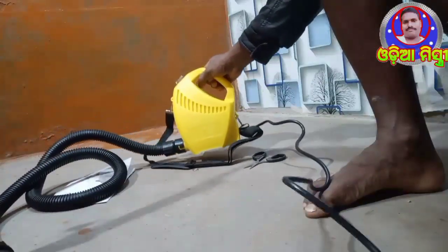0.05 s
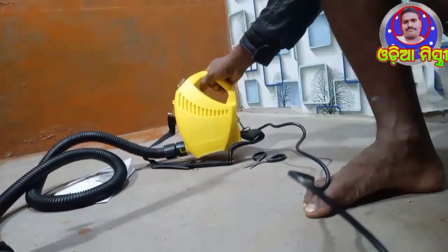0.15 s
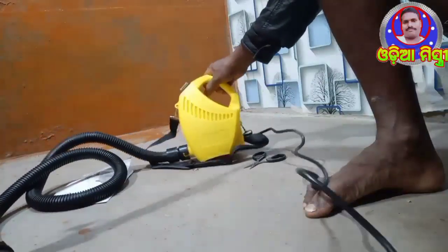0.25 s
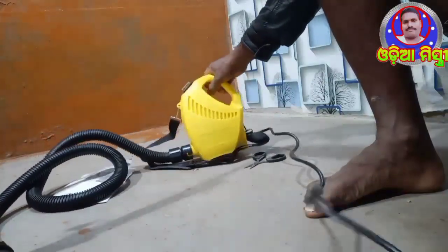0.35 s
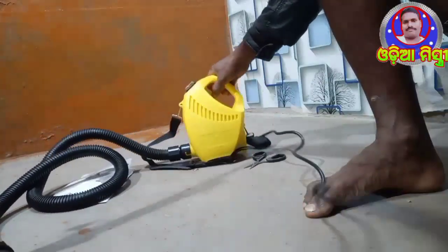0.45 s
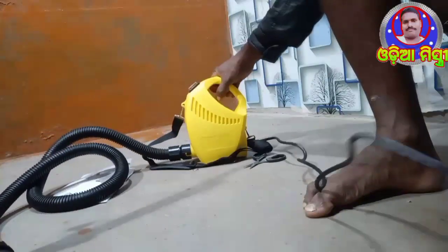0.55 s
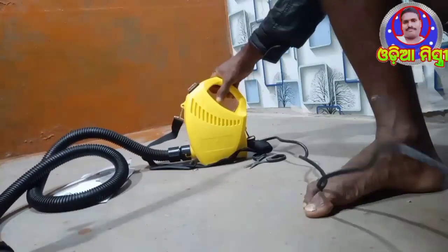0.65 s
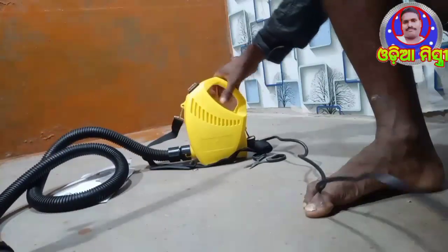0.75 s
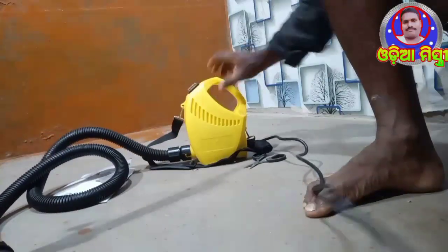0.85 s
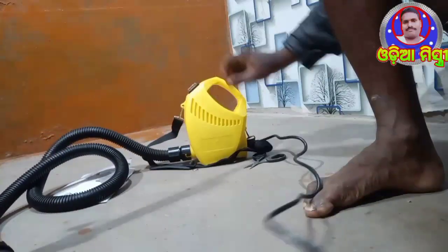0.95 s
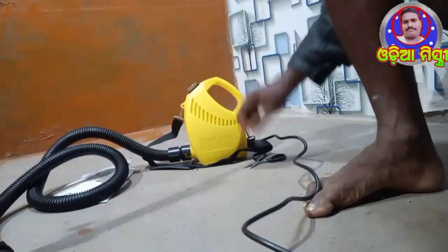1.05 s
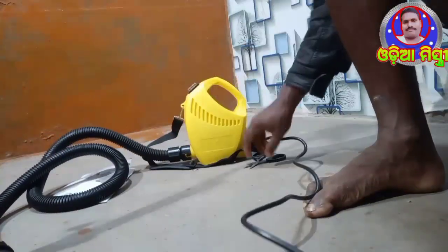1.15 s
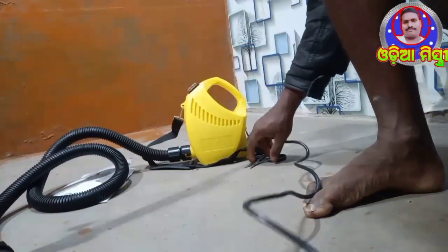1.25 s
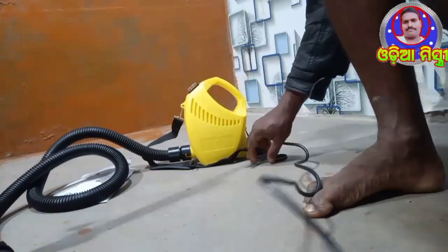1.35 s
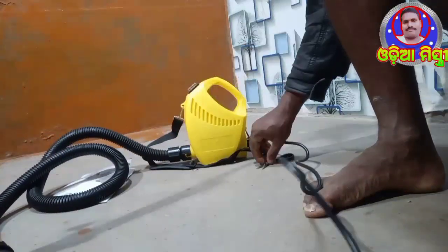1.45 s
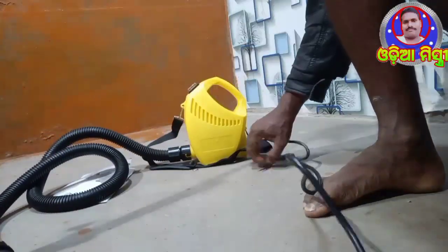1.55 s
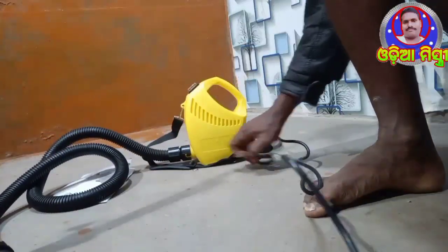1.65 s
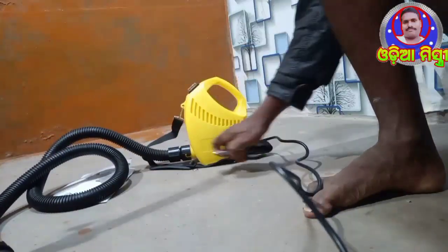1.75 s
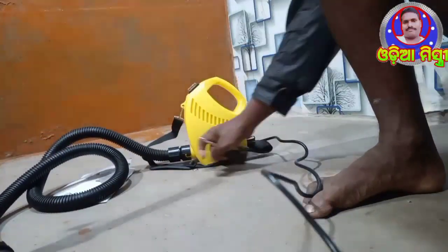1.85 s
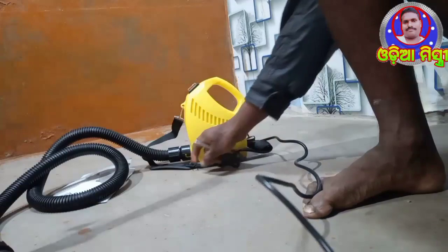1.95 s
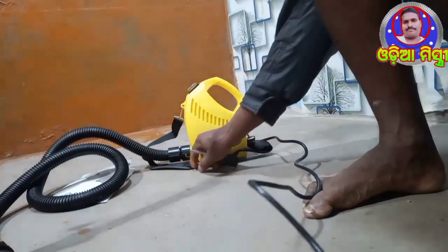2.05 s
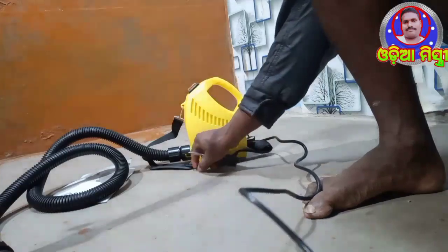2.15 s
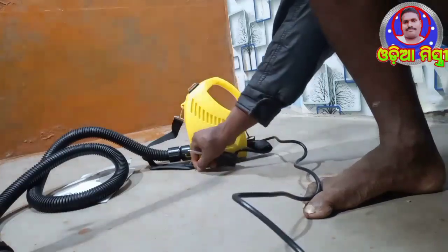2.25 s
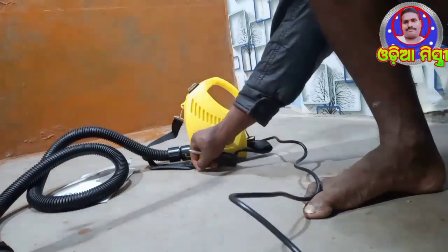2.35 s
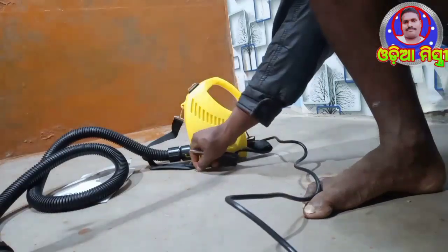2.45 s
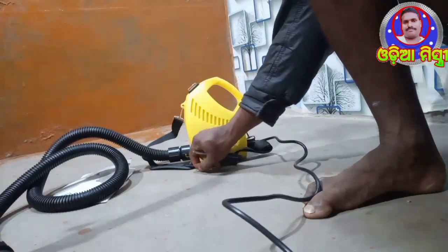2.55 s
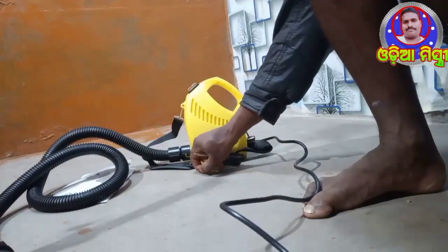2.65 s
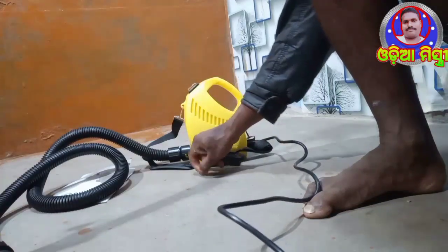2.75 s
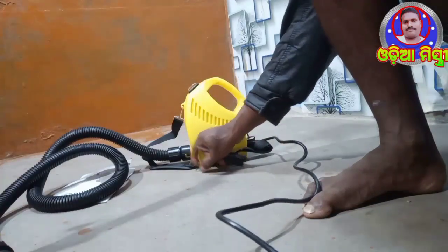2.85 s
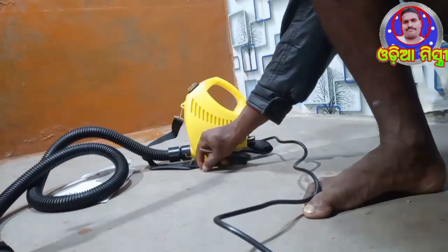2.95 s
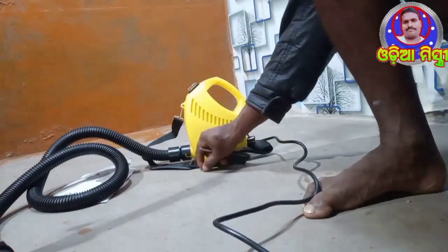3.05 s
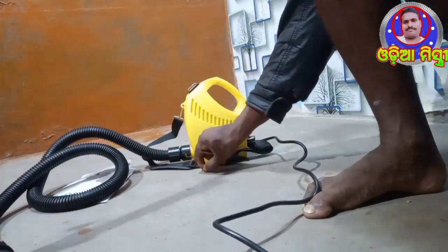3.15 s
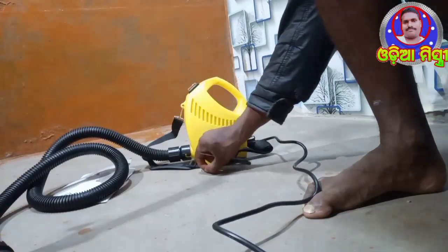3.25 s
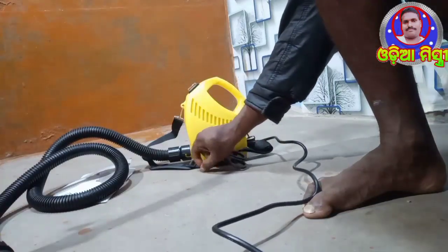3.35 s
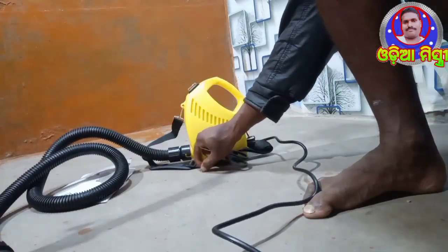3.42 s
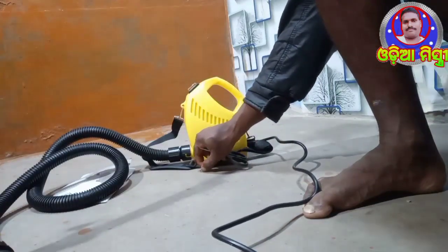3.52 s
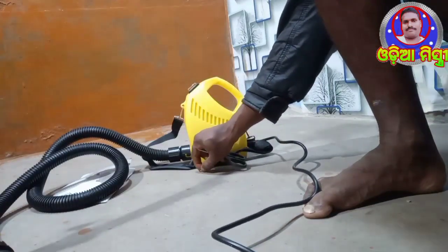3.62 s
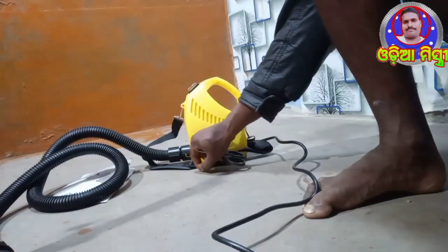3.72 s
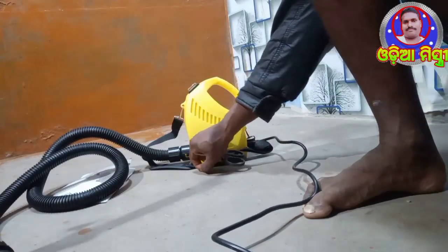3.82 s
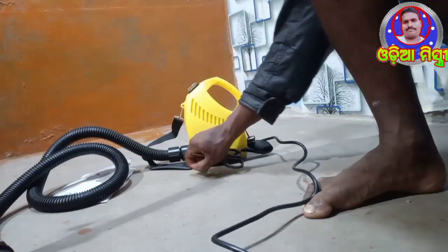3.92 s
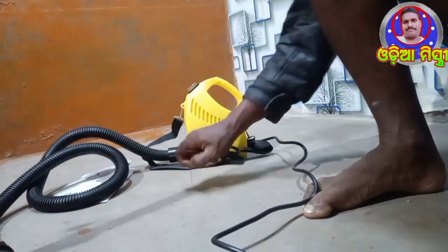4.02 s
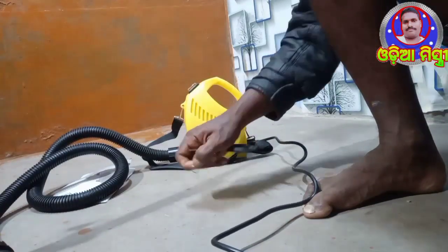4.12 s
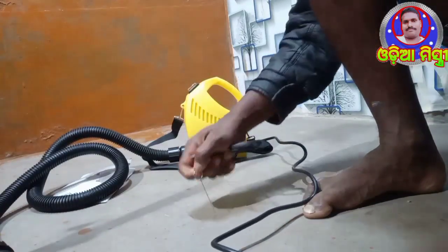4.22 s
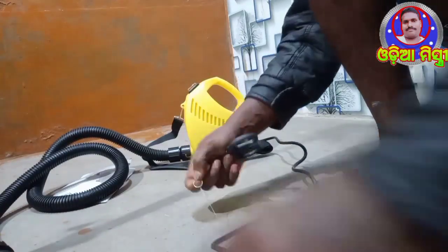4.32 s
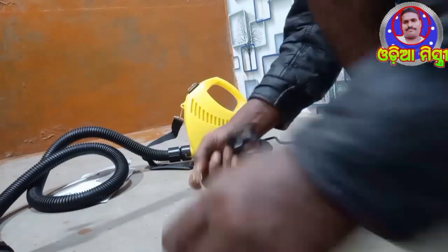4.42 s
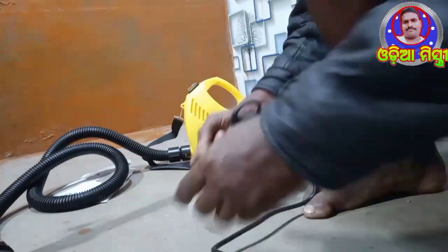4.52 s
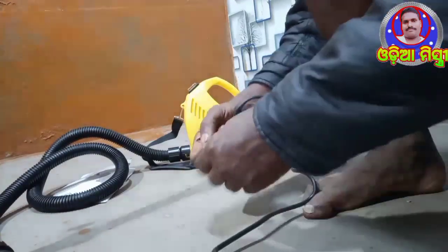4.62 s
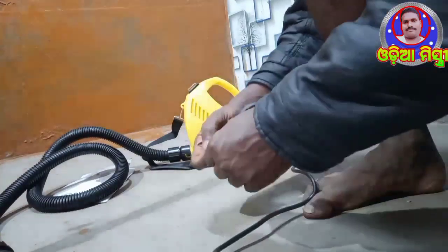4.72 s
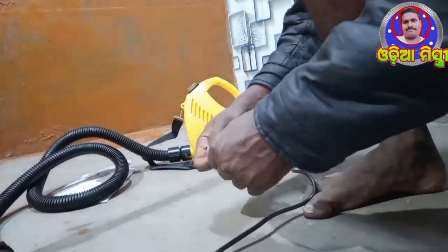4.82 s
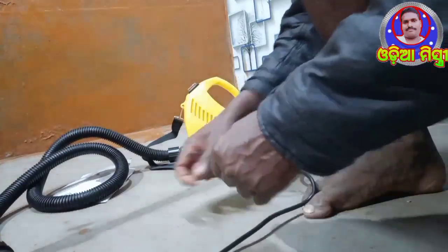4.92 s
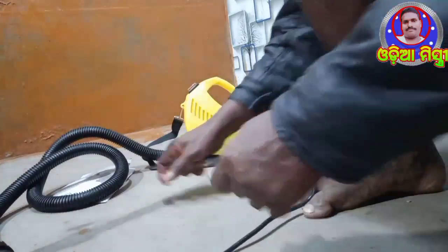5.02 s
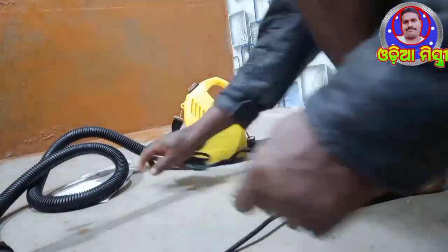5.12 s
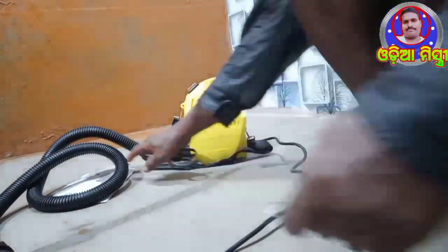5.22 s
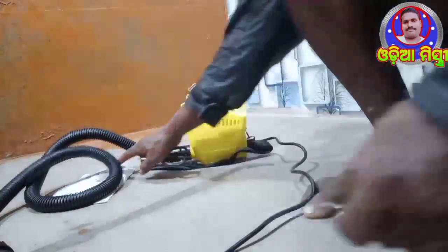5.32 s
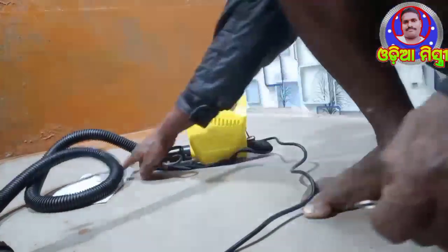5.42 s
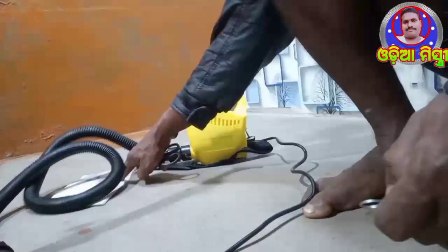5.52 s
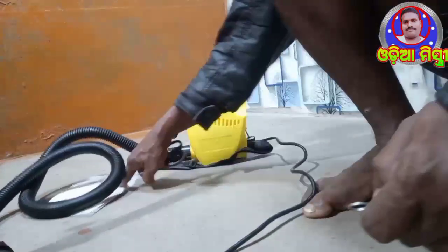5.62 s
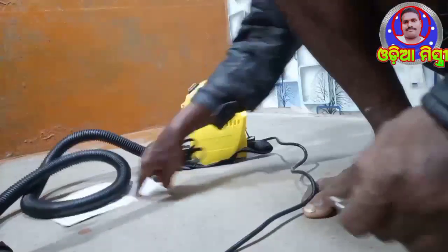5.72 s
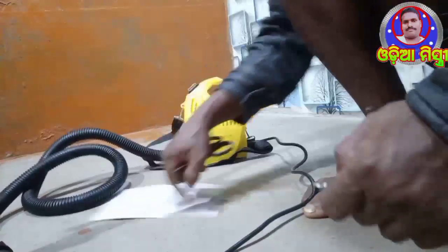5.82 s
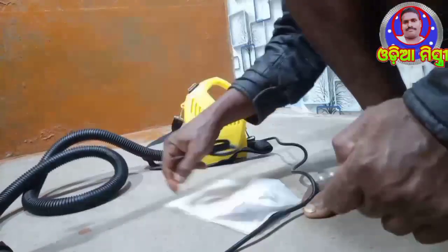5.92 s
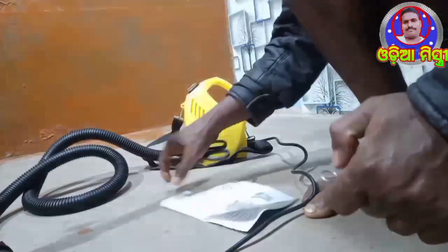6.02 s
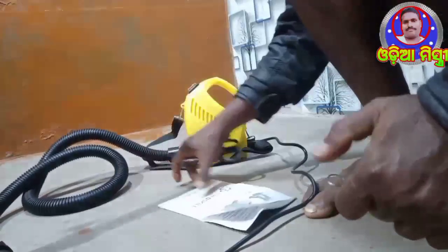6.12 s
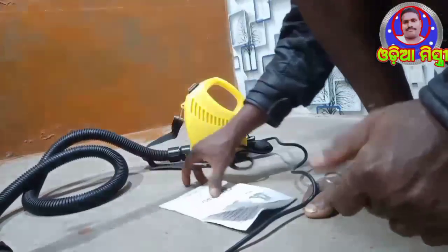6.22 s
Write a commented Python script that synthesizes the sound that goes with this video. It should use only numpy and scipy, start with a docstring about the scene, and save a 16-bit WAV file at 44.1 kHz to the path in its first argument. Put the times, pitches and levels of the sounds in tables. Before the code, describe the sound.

A hollow plastic unit clacks onto a hard floor, then a cable is handled with small snaps and a paper leaflet slides out.

```python
"""A plastic paint sprayer is set down on a hard floor in a small bare room: the impacts excite the modes
of its hollow housing as it rocks once onto its base, which then skids briefly. Hands pick up its cable
and work the tie loose; stick-slip friction makes a jacket sleeve swish, and stiff plastic releases its
strain in snaps. At the end the hose bumps dully as a paper leaflet is dragged out from under it, hissing
with its speed, and is pressed flat with a last snap."""
import sys
import numpy as np
from scipy import signal
from scipy.fft import rfft, irfft
from scipy.io import wavfile
from scipy.ndimage import uniform_filter1d

SR = 44100
rng = np.random.default_rng(int(sys.argv[2]) if len(sys.argv) > 2 else 0)


def wav_out(sig):
    """Save sig, one row per channel (or a flat mono array), as 16-bit PCM at SR to the path in sys.argv[1]."""
    wavfile.write(sys.argv[1], SR, np.round(np.clip(np.atleast_2d(sig).T, -1, 1) * 32767).astype(np.int16))


N = 276507


def amp(db):
    """Amplitude ratio of a level in decibels."""
    return 10 ** (np.asarray(db) / 20)


def unit_rms(x):
    """Normalisation to a mean power of 1."""
    return x / np.sqrt(np.mean(x ** 2) + 1e-20)


def curve_at(points, hz):
    """Interpolation of (f, value) points on a logarithmic frequency axis."""
    f, value = np.transpose(points)
    return np.interp(np.log(hz + 1), np.log(f + 1), value)


def add(mix, start_s, sound):
    """Superposition: a sound joins the mix at its start time."""
    part = mix[max(round(start_s * SR), 0):][:len(sound)]
    part += sound[:len(part)]


def coloured(x, spectrum, extra_db=lambda hz: 0, size=4096):
    """Minimum-phase filtering by a spectrum scaled to unit energy, then reshaped by extra_db."""
    hz = np.fft.rfftfreq(size, 1 / SR)
    gain = unit_rms(amp(curve_at(spectrum, hz))) * amp(extra_db(hz))
    cepstrum = irfft(np.log(gain))
    cepstrum[1:size // 2] *= 2  # folding onto positive time makes the filter causal
    cepstrum[size // 2 + 1:] = 0
    response = irfft(np.exp(rfft(cepstrum)))[:size // 2]
    return signal.oaconvolve(x, response)[:len(x)]


def resonate(x, hz, width_hz):
    """Forced vibration: a resonator of peak gain 1 whose natural frequency follows the curve hz."""
    carrier = np.exp(2j * np.pi * np.cumsum(hz) / SR)
    pole = np.exp(-np.pi * width_hz / SR)
    return 2 * (carrier * signal.lfilter([1 - pole], [1, -pole], x / carrier)).real


def ring(modes, rise_s, corner_hz):
    """Free vibration: damped modes of random phase; a soft blow barely excites those above corner_hz."""
    t = np.arange(SR) / SR
    hz, db, t60 = np.transpose(modes)[:, :, None]
    waves = amp(db - 60 * t / t60) * np.sin(2 * np.pi * (hz * t + rng.random(hz.shape)))
    onset = 1 - np.exp(-(t / rise_s) ** 2)
    return (waves / (1 + (hz / corner_hz) ** 2)).sum(0) * onset


def friction(slips_per_s, spread_db, hiss, flutter_db):
    """Stick-slip friction: tiny impulses of uneven size over a smooth hiss, fluctuating in level."""
    sizes = rng.choice([-1, 1], N) * amp(spread_db * np.minimum(rng.exponential(1, N), 3))
    slips = sizes * (rng.random(N) < slips_per_s / SR)
    flutter = unit_rms(signal.oaconvolve(rng.standard_normal(N), np.hanning(SR // 50), "same"))
    force = unit_rms(slips) + hiss * rng.standard_normal(N)
    return unit_rms(force * amp(flutter_db * flutter))


def crackle(decay_s, grain_db, first_tick):
    """Impulsive excitation of unit energy: a first tick, then an exponentially dying spray."""
    t = np.arange(SR // 6) / SR
    ticks = rng.standard_normal(len(t)) * amp(grain_db * rng.standard_normal(len(t)))
    ticks *= np.exp(-t / decay_s)
    ticks[0] = first_tick
    return ticks / np.linalg.norm(ticks)


# Reverberation time of the room: f/Hz, T60/s
ROOM_T60 = [(100, 1), (260, 0.4), (700, 0.39), (1840, 0.3), (4000, 0.3), (9000, 0.2), (14000, 0.26)]

def room(x, wet_db, echoes_per_s=6000, gap_s=0.002):
    """Reverberation: dense reflections follow the direct sound; absorption leaves the bass longest."""
    echoes = rng.standard_normal(SR) * (rng.random(SR) < echoes_per_s / SR)
    echoes *= np.arange(SR) > gap_s * SR
    hz, t, bands = signal.stft(echoes, SR, nperseg=256)
    decay = amp(-60 * t / curve_at(ROOM_T60, hz)[:, None])
    tail = signal.istft(bands * decay, SR)[1]
    return x + amp(wet_db) * signal.oaconvolve(x, tail / np.linalg.norm(tail))[:N]


# Spectrum of the room's air: f/Hz, relative level/dB
AIR_SPECTRUM = [(25, -24.5), (50, -13), (74, 6), (100, -6), (150, 6.5), (300, -3), (700, -6.5), (1300, -14),
                (2700, -9), (4000, -13.5), (6000, -33), (9200, -26.5), (12000, -40.5), (15500, -36)]
# Faint tones: t/s, duration/s, f/Hz, level/dB
FAINT_TONES = [(4.89, 0.18, 428, -69), (4.96, 0.08, 1080, -67), (5.02, 0.087, 1075, -65),
               (5.01, 0.05, 2380, -68)]

def background(air_db=-71.5, waver=0.0035):
    """Ambient noise: quiet air, and brief tones that swell and fade with slight frequency modulation."""
    tones = np.zeros(N)
    for start, duration, hz, db in FAINT_TONES:
        drift = unit_rms(uniform_filter1d(rng.standard_normal(SR), size=800))[:int(duration * SR)]
        phase = 2 * np.pi * np.cumsum(hz * (1 + waver * drift)) / SR
        add(tones, start, amp(db) * np.hanning(len(drift)) * np.sin(phase))
    return amp(air_db) * coloured(rng.standard_normal(N), AIR_SPECTRUM) + room(tones, wet_db=-3)


# Arm movements: t/s, duration/s, level/dB, fizz offset/dB
ARM_STROKES = [(-0.15, 0.66, -67.5, -16), (0.618, 0.22, -64.5, -16.5), (1.039, .24, -61.5, -8),
               (1.243, .29, -70.5, -12.5), (1.547, 0.32, -69, -9.5), (1.98, 0.65, -63, -13),
               (2.62, 0.57, -64, -13.5), (3.118, 0.38, -66, -8.5), (3.521, 0.082, -67.5, -17),
               (4.131, .18, -59.5, -6.5), (4.335, 0.57, -63.5, -10.5), (5.12, 0.56, -68.5, -11.5),
               (5.416, 0.4, -59.5, -12)]
# Spectra of rubbing cloth, body and fizz: f/Hz, relative level/dB
CLOTH_BODY = [(30, -25), (70, -9), (160, 5), (300, -1), (700, 2), (1200, -5), (2500, -0.5), (3900, -2),
              (5200, -16), (6500, -21.5), (9000, -35)]
CLOTH_FIZZ = [(4000, -30.5), (6500, -8.5), (8000, -1.5), (9200, 3), (11000, -9.5), (15500, -14.5)]

def sleeve(fizz_db=-1, peak_share=0.29, speed_exponent=0.8):
    """Friction noise of cloth and cable: amplitude is a power of speed, which arches once a stroke."""
    slips = friction(slips_per_s=900, spread_db=4.5, hiss=1.4, flutter_db=0.47)
    t, body, fizz = np.arange(N) / SR, np.zeros(N), np.zeros(N)
    for start, duration, db, offset_db in ARM_STROKES:
        speed = np.sin(np.pi / 2 * np.interp((t - start) / duration, [0, peak_share, 1], [0, 1, 0]))
        envelope = amp(db) * speed ** speed_exponent
        body += envelope
        fizz += envelope * amp(offset_db + fizz_db)
    return room(coloured(slips * body, CLOTH_BODY) + coloured(slips * fizz, CLOTH_FIZZ), wet_db=-5.5)


# Hose and cable meet the floor: t/s, relative level/dB
HOSE_BUMPS = [(3.07, -52), (5.458, -48.5), (5.536, -49.5), (5.701, -46), (5.839, -43), (6.069, -50),
              (6.159, -47.5)]
# Modes of the hose: nominal f/Hz, relative level/dB, T60/s
HOSE_MODES = [(131.2, -2.5, 0.37), (161.7, 2.5, 0.73), (182.8, 0.5, 0.47), (226, -6, 0.45),
              (308.5, -4.5, 0.38), (417, -10.5, 0.91), (506, -8.5, 0.32)]

def hose(bump_db=-1, detune=0.0845):
    """Soft impacts excite low modes; each lands on another part of the coil, which shifts the pitch."""
    bumps = np.zeros(N)
    for start, db in HOSE_BUMPS:
        shift = 1 + detune * rng.uniform(-1.17, 1)
        modes = [(hz * shift, mode_db, t60) for hz, mode_db, t60 in HOSE_MODES]
        add(bumps, start, amp(db + bump_db) * ring(modes, rise_s=0.0021, corner_hz=1310))
    return bumps


# Spectrum of the skidding base: f/Hz, relative level/dB
SKID_SPECTRUM = [(350, -30), (600, -6.5), (1020, 5.5), (1170, 0), (1450, 4), (2080, -4), (2350, 0.5),
                 (2640, -10), (3040, -1), (4450, -18.5), (7000, -36), (9100, -54), (15400, -120)]

def skid(start_s=0.838, duration_s=0.11, level_db=-45.5):
    """Stick-slip motion: as the hand lets go, the base judders over the floor in one arch of speed."""
    speed = np.sin(np.pi * np.clip((np.arange(N) / SR - start_s) / duration_s, 0, 1))
    slips = friction(slips_per_s=700, spread_db=2, hiss=0.8, flutter_db=1)
    return room(coloured(slips * speed * amp(level_db), SKID_SPECTRUM), wet_db=-3.5)


def leaflet_speed(start_s=5.705, pull_s=0.32, brake_s=0.061, glide_s=0.055, stop_s=0.072, glide=0.27):
    """Piecewise uniform acceleration: pull, brake, glide and stop, as a share of top speed."""
    times = start_s + np.cumsum([0, pull_s, brake_s, glide_s, stop_s])
    return np.interp(np.arange(N) / SR, times, [0, 1, glide, glide, 0])


# Spectra of sliding paper, hiss and fizz: f/Hz, relative level/dB
PAPER_HISS = [(30, -41), (100, -14.5), (300, -14), (520, -16.5), (750, -11), (1200, -18), (1900, -8.5),
              (2700, -4.5), (3600, -2.5), (4500, -9.5), (5600, -16.5), (7000, -22), (10000, -49)]
PAPER_FIZZ = [(4500, -40), (6500, -12), (8000, -1), (9100, 4), (10800, -4.5), (13000, -7.5), (15500, -12)]
# Resonances of the sheet: initial f/Hz, bandwidth per filter stage/Hz, relative level/dB
SHEET_MODES = [(1910, 124, 5), (2620, 280, 4), (3670, 1100, 9)]

def leaflet(hiss_db=-31.5, fizz_db=-30.5, sheet_db=-38.5, sag=0.12):
    """Roughness noise: paper on grit brightens with speed; its resonances sink as more is drawn free."""
    speed = leaflet_speed()
    slips = friction(slips_per_s=1900, spread_db=2.0, hiss=0.9, flutter_db=0.73)
    hiss = coloured(slips * amp(hiss_db) * speed ** 0.51, PAPER_HISS)
    fizz = coloured(slips * amp(fizz_db) * speed ** 0.87, PAPER_FIZZ)
    drawn_share = np.cumsum(speed) / speed.sum()
    tuning = 1 - sag * drawn_share ** 2
    modes = [amp(db) * resonate(resonate(slips, hz * tuning, width), hz * tuning, width)
             for hz, width, db in SHEET_MODES]
    exponents = 0.34 * 1.66 ** np.arange(len(modes))  # low resonances speak first
    sheet = sum(mode * speed ** power for mode, power in zip(modes, exponents)) / np.std(sum(modes))
    return room(hiss + fizz + sheet * amp(sheet_db), wet_db=-6.5)


def faint_ticks(from_s=1.5, to_s=4.75, per_s=4, low_hz=2500, high_hz=9500):
    """Random impulses: fingers on the cable make small snaps, given as rows like SNAP_EVENTS."""
    span = to_s - from_s
    loudest_db, range_db, treble_db, decay_s = -53.5, 2, 5.5, 0.003
    return [(from_s + when * span, loudest_db - range_db * softness, treble_db, decay_s,
             low_hz * (high_hz / low_hz) ** pitch)
            for when, softness, pitch in rng.random((int(span * per_s), 3))]


def creep(decay_s, rise_share=0.66, relative_db=-5):
    """Microslip: the grip creeps before a snap, in noise that grows exponentially."""
    time_left = np.arange(SR // 20)[::-1] / SR
    envelope = np.exp(-time_left / (rise_share * decay_s)) * np.sqrt(2 / (decay_s * SR))
    return amp(relative_db) * rng.standard_normal(len(time_left)) * envelope


# Snaps of cable, tie, plug and paper: t/s, relative level/dB, treble shelf/dB, decay time/s, ring f/Hz
SNAP_EVENTS = [(0.151, -43, -12.5, 0.008, 755), (0.741, -33, -19.5, 0.0049, 1500),
               (0.831, -53, 24, 0.0047, 9660), (1.648, -48, 13, 0.016, 8960), (1.792, -48, 1, 0.002, 3740),
               (1.893, -37, -1, 0.026, 3380), (2.161, -36.5, -11, 0.0048, 3830),
               (2.691, -38.5, 2.5, 0.0038, 2700), (2.808, -34.5, 2.5, 0.016, 6960),
               (2.956, -38, -6, .002, 3300), (2.974, -27, 0, 0.005, 3940), (2.989, -25.5, 11, 0.0082, 9430),
               (2.9913, -14, -2, 0.00017, 2760), (3.008, -25.5, -7, 0.0053, 1660),
               (3.0672, -23, -6, 0.0004, 840), (3.082, -26, -2.5, 0.029, 661),
               (3.334, -37.5, 0, 0.0079, 830), (4.158, -37, 4, 0.012, 2598), (4.233, -46, 5, 0.018, 13500),
               (4.691, -40.5, -3.5, .002, 2610), (5.669, -26, 8.5, 0.013, 1945),
               (6.164, -13.5, 6, 0.0038, 2950)]
# Spectrum common to all snaps: f/Hz, relative level/dB
SNAP_SPECTRUM = [(40, -21.5), (170, -0.5), (700, 0), (1500, -2), (2800, 3.5), (4000, 0.5), (5200, -15.5),
                 (7000, -14.5), (9200, -8.5), (11500, -18), (15500, -24)]

def snaps(snap_db=8.5, shelf_hz=5500, ring_db=7, ring_width_share=0.051):
    """Sudden release of strain: plastic and paper crackle, with one clear resonance and many weak ones."""
    out = np.zeros(N)
    for start, db, treble_db, decay_s, ring_hz in list(SNAP_EVENTS) + faint_ticks():
        def own_colour_db(hz):
            shelf = treble_db * (1 - 1 / (1 + (hz / shelf_hz) ** 6))
            ripple = unit_rms(uniform_filter1d(rng.standard_normal(len(hz)), size=20))
            weak_rings = 2 * ripple * hz / (hz + 2500)
            clear_ring = ring_db / (1 + ((hz / ring_hz - 1) / ring_width_share) ** 2)
            return shelf + weak_rings + clear_ring
        release = crackle(decay_s, grain_db=2.5, first_tick=8)
        lead_in = creep(decay_s)
        snap = coloured(np.append(lead_in, release), SNAP_SPECTRUM, own_colour_db)
        add(out, start - len(lead_in) / SR, amp(db + snap_db) * snap)
    return room(out, wet_db=0)


# Housing meets floor: t/s, relative level/dB, clack corner f/Hz, base panel f/Hz, boom offset/dB
FLOOR_IMPACTS = [(0.4416, -14, 4864, 253.4, -5.5), (0.4575, -15.5, 5980, 264, -36),
                 (0.7478, -21.5, 1700, 266.2, -4.5), (0.803, -34.5, 1480, 278.4, -4.5)]
# Modes of the hollow housing in the room: f/Hz, relative level/dB, nominal T60/s
HOUSING_MODES = [(74, -38.5, 1.3), (157.2, -15, 0.62), (182.3, -16, 0.43), (245.1, 2.5, 0.41),
                 (321, -7.5, .58), (387, -10.5, .42), (415.6, -5.5, 0.63), (482, -6.5, 0.2),
                 (507.4, -7, .3), (560, -3, 0.17), (646, -5.5, 0.24), (688, -4.5, 0.11), (774, -4, 0.34),
                 (775, -11.5, 0.78), (863, -11, 0.25), (1070, -13.5, 0.29)]
# Spectrum of its dense, quickly damped wall modes: f/Hz, relative level/dB
WALL_SPECTRUM = [(30, -23.5), (90, -18), (220, 10), (400, 5.5), (680, 5.5), (1000, 1), (2000, -2.5),
                 (3900, -7.5), (5200, -20), (6800, -30), (9000, -18.5), (12000, -35), (15500, -32.5)]

def housing(clack_db=19, panel_db=-3, panel_t60=0.73, damping_hz=1100):
    """Impact excitation: the plastic walls clack and the body booms, its high modes dying sooner."""
    clacks, booms = np.zeros(N), np.zeros(N)
    damped_modes = [(hz, db, t60 / (1 + (hz / damping_hz) ** 2)) for hz, db, t60 in HOUSING_MODES]
    for start, db, corner_hz, panel_hz, boom_db in FLOOR_IMPACTS:
        contact = crackle(decay_s=0.015, grain_db=0.5, first_tick=11.1)
        clack = coloured(contact, WALL_SPECTRUM, lambda hz: -10 * np.log10(1 + (hz / corner_hz) ** 2))
        add(clacks, start, amp(db + clack_db) * clack)
        panel_mode = (panel_hz, panel_db, panel_t60)  # the base rings higher once it stands
        boom = ring(damped_modes + [panel_mode], rise_s=0.0028, corner_hz=0.58 * corner_hz)
        add(booms, start, amp(db + boom_db) * boom)
    return room(clacks, wet_db=2) + booms


def scene():
    """Superposition of all sources at one microphone near the floor."""
    return (background() + housing() + skid() + sleeve() + snaps() + leaflet() + hose())[None]


def record(dry):
    """Band limiting: a linear-phase low-pass filter removes the highest treble."""
    lowpass = signal.firwin(511, cutoff=15750, window=("kaiser", 9), fs=SR)
    return signal.oaconvolve(dry, lowpass[None], "same")


dry = scene()
out = record(dry)
wav_out(out)
```